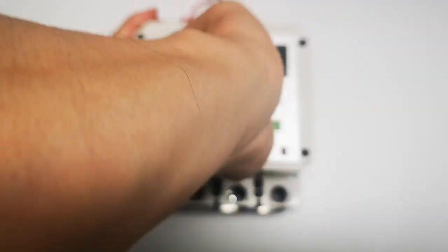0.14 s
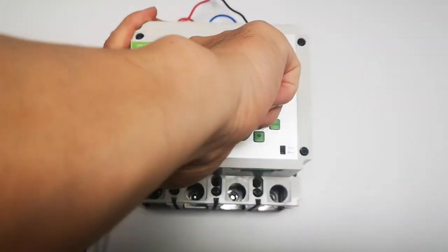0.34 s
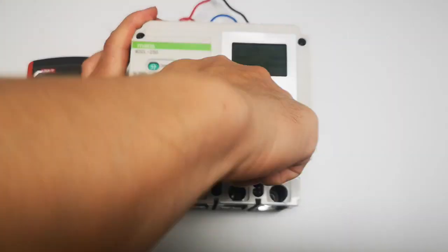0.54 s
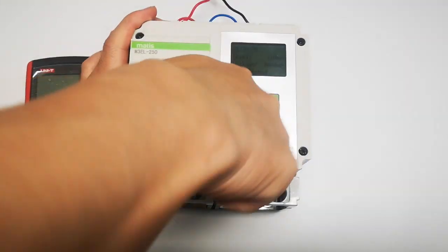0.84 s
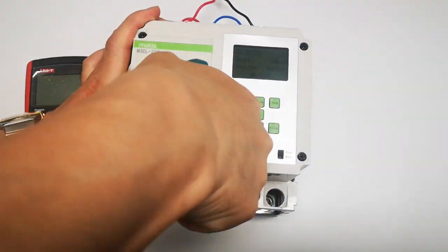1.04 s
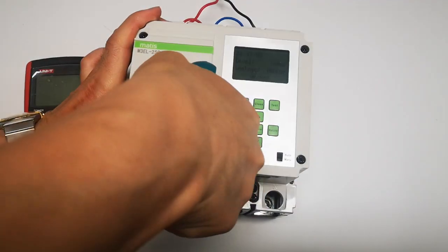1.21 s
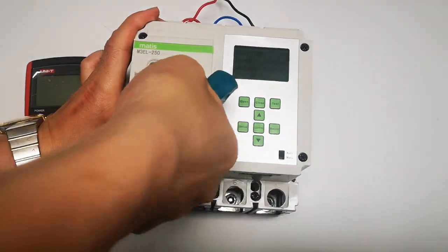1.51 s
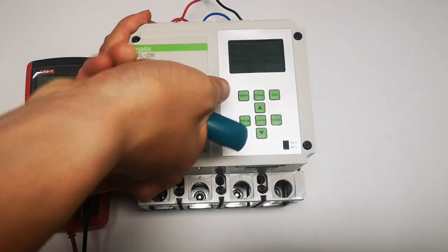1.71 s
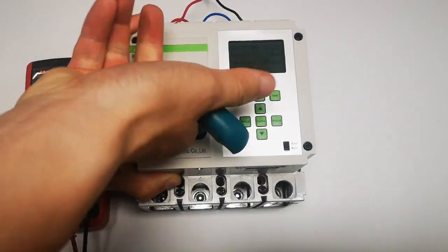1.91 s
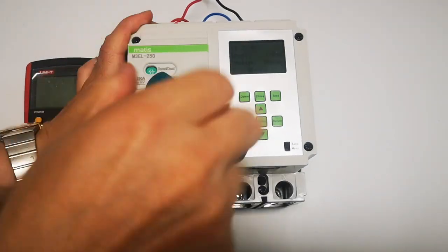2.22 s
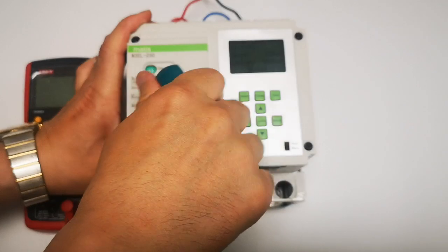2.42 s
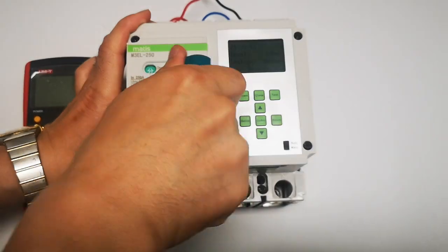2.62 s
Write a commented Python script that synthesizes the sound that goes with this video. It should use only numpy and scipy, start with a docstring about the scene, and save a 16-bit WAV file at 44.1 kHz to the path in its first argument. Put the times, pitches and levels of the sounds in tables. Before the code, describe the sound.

Sharp, springy plastic-cased breaker clacks at uneven intervals, with short ringing echoes and faint latch ticks

```python
"""A bare, ringing room: a moulded-case circuit breaker is worked by hand on a bench, close to the microphone.
Latches tick and the sprung mechanism clacks: shaped bursts and damped modes sound through the plastic case.
Each contact also thumps the bench and wakes the room's low standing waves; a long noise echo follows.
Soft hand bumps and a steady hush are filtered noise. A gain control ducks at each big clack
and swells back over the echo."""
import sys
import numpy as np
from scipy import signal
from scipy.fft import rfft, irfft, next_fast_len
from scipy.io import wavfile
from scipy.ndimage import uniform_filter1d, map_coordinates

SR = 44100
rng = np.random.default_rng(int(sys.argv[2]) if len(sys.argv) > 2 else 0)


def inscribe(sig):
    """Save sig as 16-bit PCM at rate SR to the path in sys.argv[1].

    A 1-D sig is mono; a 2-D sig holds one channel per row.
    Samples are clipped to [-1, 1] before scaling.
    """
    pcm = np.round(np.clip(np.atleast_2d(sig).T, -1, 1) * 32767)
    wavfile.write(sys.argv[1], SR, pcm.astype(np.int16))


N = 121275
LENGTH = 8192  # samples in one contact sound


def amp(db):
    """Amplitude factor of a level in dB."""
    return 10 ** (np.asarray(db) / 20)


def unit(x):
    """Scale a steady sound to rms 1."""
    return x / np.sqrt(np.mean(x ** 2) + 1e-20)


def strength(x):
    """Scale a short sound to the energy of 7 ms at rms 1."""
    energy = np.mean(np.sum(x ** 2, -1))
    return x / np.sqrt(energy / (.007 * SR))


def along(points, hz):
    """Read (pitch_hz, value) points on a log frequency axis."""
    point_hz, value = np.transpose(points)
    return np.interp(np.log(hz + 1), np.log(point_hz + 1), value)


def add(track, start_s, sound):
    """Mix a sound into the track at its start time."""
    part = track[:, round(start_s * SR):][:, :sound.shape[-1]]
    part += sound[..., :part.shape[1]]


def filtered(x, response):
    """Multiply the spectrum of x by a response of frequency."""
    n = x.shape[-1]
    padded = next_fast_len(n + LENGTH)
    hz = np.fft.rfftfreq(padded, 1 / SR)
    return irfft(rfft(x, padded) * response(hz), padded)[..., :n]


def causal(db):
    """Minimum-phase response with these gains: it rings only after the strike."""
    cepstrum = irfft(np.log(amp(db)))
    cepstrum[1:LENGTH // 2] *= 2
    cepstrum[LENGTH // 2 + 1:] = 0
    return np.exp(rfft(cepstrum))


def ring(modes, size, scatter_db):
    """Sum damped sine modes, each struck with a random level and phase."""
    t = np.arange(size) / SR
    total = 0
    for pitch_hz, level_db, t60_s in modes:
        struck_db = level_db + scatter_db * rng.standard_normal()
        phase = rng.random()  # cycles
        total = total + amp(struck_db - 60 * t / t60_s) * np.sin(2 * np.pi * (pitch_hz * t + phase))
    return total


# left-right likeness of diffuse sound at the microphone: pitch_hz, likeness (1 same, -1 opposite)
LIKENESS = [(100, 0.98), (250, 0.81), (500, 0.39), (1000, -0.48), (2000, -.05), (8000, 0.55)]


def stereo_noise(size):
    """Diffuse noise whose left-right correlation follows the likeness at each frequency."""
    def mid_side(hz):
        angle = np.arccos(np.clip(along(LIKENESS, hz), -1, 1)) / 2
        return np.array([np.cos(angle), np.sin(angle)])

    mid, side = filtered(rng.standard_normal((2, size)), mid_side)
    return np.array([mid + side, mid - side])


EARLY_DB, EARLY_T60_S = -4.5, 0.02  # near walls, level against the long echo
# time the long echo takes to fall by 60 dB: pitch_hz, t60_s
ECHO_T60 = [(100, 0.31), (400, 0.84), (1000, 0.71), (2200, 0.61), (5000, 0.59), (8000, 0.5), (11000, 0.46),
            (15000, 0.26)]


def room(x):
    """Answer x with near walls and a long diffuse echo, each band of it fading at its own rate."""
    hz, t, spectrum = signal.stft(stereo_noise(size=SR), SR, nperseg=256)
    fading = spectrum * amp(-60 * t / along(ECHO_T60, hz)[:, None])
    tail = signal.istft(fading, SR, nperseg=256)[1]
    t = np.arange(tail.shape[1]) / SR
    early = stereo_noise(size=len(t)) * amp(-60 * t / EARLY_T60_S)
    echo = tail / np.linalg.norm(tail[0]) + amp(EARLY_DB) * early / np.linalg.norm(early[0])
    onset = np.minimum(t / 0.0049, 1)
    return signal.fftconvolve(np.atleast_2d(x), echo * onset, axes=1)


HUSH_DB = -62.5
# colour of the room's hush: pitch_hz, level_db (relative)
HUSH = [(25, -1.5), (70, -6.5), (120, 3.5), (250, -3.5), (500, -12.5), (1200, -10), (2200, -7.5),
        (3500, -16), (8000, -25.5), (10500, -36.5), (15000, -39.5), (16000, -51.5)]


def room_tone():
    """The steady hush of the room: diffuse noise with a fixed spectrum."""
    return amp(HUSH_DB) * unit(filtered(stereo_noise(size=N), lambda hz: amp(along(HUSH, hz))))


# moments when the hand shifts the case: start_s, level_db, length_s (time constant of the fall)
NUDGES = [(0.066, -46, .08), (0.914, -50, 0.047), (1.4, -53, 0.12), (2.571, -45.5, 0.11)]
# colour of those bumps: pitch_hz, level_db (relative)
NUDGE_COLOUR = [(25, -6.5), (70, 20.5), (130, -7), (300, -9), (900, -56)]


def handling():
    """Soft low bumps as the hand leans on the case: noise that swells and dies away."""
    t = np.arange(N) / SR
    swell = np.zeros(N)
    for start_s, level_db, length_s in NUDGES:
        rise = np.clip((t - start_s) / 0.018, 0, 1)
        swell += amp(level_db) * rise * np.exp(-abs(t - start_s) / length_s)
    rumble = filtered(stereo_noise(size=N), lambda hz: amp(along(NUDGE_COLOUR, hz)))
    return swell * unit(rumble)


THUMP_S = 0.011  # time constant of the push, before its spectrum is flattened
LOW_ROOM_DB = -1.5  # echo of the thump
STANDING_T60_S, STANDING_RISE_S = .88, 0.034  # fall by 60 dB, time constant of the build-up
# response of the bench: pitch_hz, level_db (relative)
BENCH = [(25, 0), (60, -1), (120, 4.5), (240, 3.5), (330, -1), (480, -14.5), (900, -65.5), (3000, -35)]
# standing waves of the room: pitch_hz, level_db (against the thump)
STANDING_WAVES = [(66, -20.5), (119.6, -11.5), (143.5, -13), (179, -20.5), (223, -19), (268, -15.5)]


def bench():
    """The recoil of each contact thumps the bench and sets the room's standing waves going."""
    out = np.zeros((2, N))
    hz, t = np.fft.rfftfreq(LENGTH, 1 / SR), np.arange(SR) / SR
    waves = [(pitch_hz, level_db, STANDING_T60_S) for pitch_hz, level_db in STANDING_WAVES]
    fall = np.exp(-np.arange(LENGTH) / SR / THUMP_S)
    for start_s, level_db, *_, thump_db, _ in CLACKS:
        level = amp(level_db + thump_db)
        push = rfft(fall * rng.standard_normal(LENGTH))
        knock = irfft(push / abs(push) * causal(along(BENCH, hz)))
        thump = level * strength(knock[:LENGTH // 2])
        add(out, start_s, thump)
        add(out, start_s, amp(LOW_ROOM_DB) * room(thump))
        boom = ring(waves, size=SR, scatter_db=2)
        add(out, start_s, level * boom * (1 - np.exp(-t / STANDING_RISE_S)))
    return out


ATTACK_S, RELEASE_S = 0.00066, 0.015  # time constant of the rise, fall by 60 dB


def chatter(length_s):
    """A few milliseconds of contact, nearly even across all frequencies."""
    t = np.arange(LENGTH) / SR
    shape = (1 - np.exp(-t / ATTACK_S)) * amp(-60 * np.maximum(t - length_s, 0) / RELEASE_S)
    burst = rng.standard_normal((2, LENGTH)) * shape  # one for each side of the case
    for _ in range(3):  # flatten the spectrum, then shape in time again
        spectrum = rfft(burst)
        burst = irfft(spectrum / (abs(spectrum) + 1e-12)) * shape
    return burst


EDGE_POWER = 4  # steepness of a contact's low and high edges
RING_OCTAVES = .25  # width of the main ring
RIPPLE_DB, RIPPLE_HZ = 2.5, 108.2  # crowded small resonances: depth, spacing
# how much of the treble setting applies: pitch_hz, share
TREBLE = [(1800, 0.46), (4000, 0.91), (9000, 1)]


def colour(hz, low_hz, high_hz, ring_hz, ring_db, treble_db):
    """What one point of contact brings out of the case, in dB."""
    low_edge = 1 + (low_hz / (hz + 1)) ** (2 * EDGE_POWER)
    high_edge = 1 + (hz / high_hz) ** (2 * EDGE_POWER)
    edges_db = np.maximum(-10 * np.log10(low_edge * high_edge), -50)
    octaves_away = np.log2((hz + 1) / ring_hz)
    peak_db = ring_db * np.exp(-.5 * (octaves_away / RING_OCTAVES) ** 2)
    ripple_db = RIPPLE_DB * map_coordinates(rng.standard_normal(size=512), [hz / RIPPLE_HZ])
    return edges_db + peak_db + ripple_db + treble_db * along(TREBLE, hz)


DIRECT_PAN_DB = -6.5  # direct clack, left minus right
ROOM_DB = -2.5  # echo of the clack
# contacts of the mechanism, which the bench answers too: start_s, level_db, low_edge_hz, high_edge_hz,
# ring_hz, ring_db, treble_db, thump_db (bench, against level_db), length_s (chatter)
CLACKS = [(0.2115, -38, 2500, 14000, 2900, -3, 8.5, -6.5, 0.0027),
          (0.2383, 13.5, 787, 15000, 1800, 7.5, 8, -21.5, 0.0042),
          (0.5555, -12, 390, 14000, 1700, 2.5, -1.5, -8, 0.0041),
          (0.568, -13.5, 300, 13000, 1950, 5.5, 8.5, -21.5, 0.0045),
          (1.005, -41, 705, 13000, 1500, 4.5, -5, -6.5, .004),
          (1.19, -43, 950, 5900, 3600, 4, 5, -13, 0.00428),
          (1.4218, -27.5, 2380, 14000, 2407, 9.5, -6.5, -21, .0025),
          (1.483, -27.5, 1130, 11100, 2550, -1.5, -7.5, -11.5, .0055),
          (1.6368, -22.5, 940, 17300, 1200, 8.5, 3, -23, .0025),
          (1.7248, -25, 300, 10000, 1100, 9, -3, -6, 0.01),
          (1.736, -3, 300, 13000, 2330, 1, 1.5, -10, .005),
          (1.7545, -8.5, 300, 13000, 2000, 6.5, -2, -13, 0.0046),
          (2.436, -44.5, 800, 6000, 1300, 12, -13, -10, .005),
          (2.4393, -29.5, 500, 11500, 1220, 2, -6, -36, 0.0061),
          (2.4535, -26, 400, 14000, 1850, 6, 0.5, -19, 0.009),
          (2.465, -29, 400, 13000, 1200, 4.5, -11, -11, 0.0032),
          (2.475, -34.5, 600, 15000, 8650, 0.5, 19, -2.5, 0.0059),
          (2.708, -48.5, 900, 9000, 2540, 7, -8, 4, 0.00247)]
# response of the plastic case: pitch_hz, level_db (relative)
CASE = [(100, -20.5), (350, -7), (620, -11.5), (850, -8), (1100, -3.5), (1450, -4.5), (1850, 0), (2400, -2),
        (3200, -6.5), (4500, -10), (6200, -13.5), (7300, -11), (9000, -15), (10400, -27.5), (14800, -35),
        (16000, -46.5)]
# ringing of case and steel parts: pitch_hz, level_db (relative), t60_s
PART_MODES = [(1390, -9.5, 0.061), (1667, -7.5, .013), (2233, -15, .012), (2850, -23, .02),
              (3110, -20, 0.014), (3800, -21.5, 0.033), (5300, -28, 0.025), (5350, -17.5, 0.056),
              (7000, -44.5, .022), (8400, -55.5, .014)]


def breaker():
    """Each contact rattles the plastic case and rings its parts; the room answers."""
    out = np.zeros((2, N))
    hz, t = np.fft.rfftfreq(LENGTH, 1 / SR), np.arange(LENGTH) / SR
    pan = amp(np.array([[.5], [-.5]]) * DIRECT_PAN_DB)
    attack = 1 - np.exp(-t / ATTACK_S)
    for start_s, level_db, *tone, _, length_s in CLACKS:
        case = strength(irfft(rfft(chatter(length_s)) * causal(along(CASE, hz))))
        parts = np.array([ring(PART_MODES, size=LENGTH, scatter_db=2.5) for _ in range(2)]) * attack
        coloured = irfft(rfft(case + parts) * causal(colour(hz, *tone)))
        clack = amp(level_db) * strength(coloured)
        add(out, start_s, clack * pan)
        add(out, start_s, amp(ROOM_DB) * room(clack))
    return out


def scene():
    """Hush, hand, bench and breaker together in the room."""
    return room_tone() + handling() + bench() + breaker()


# where gain control sets in, share of the excess it removes, time it takes to let go
THRESHOLD_DB, SQUEEZE, RECOVER_S = -13, .79, .32


def gain_control(x, size, count):
    """Gain in dB, by blocks: it drops just ahead of a loud clack and climbs back in a set time."""
    power = abs(uniform_filter1d(np.mean(x ** 2, 0), size=300))  # centred, so it sees a clack coming
    level_db = 10 * np.log10(power + 1e-12)
    duck_db = SQUEEZE * np.maximum(level_db[::size] - THRESHOLD_DB, 0)
    recent_db = np.lib.stride_tricks.sliding_window_view(np.pad(duck_db, (count - 1, 0)), count)
    age_s = np.arange(count)[::-1] * size / SR
    held_db = np.max(recent_db * (1 - age_s / RECOVER_S), axis=1)  # deepest duck still letting go
    return -np.interp(np.arange(N), np.arange(N)[::size], held_db)


TOP_HZ = 16000  # nothing passes from here up
# unequal ports of the microphone: pitch_hz, level_db (left minus right)
PORTS = [(300, 0), (600, -1), (1100, 1.5), (2000, -3.5), (3200, -2.5), (5000, 1.5), (9000, 3.5),
         (12000, -4.5)]


def record(dry):
    """The close microphone: unequal ports, gain control, clipping and a band limit."""
    halves = np.array([[.5], [-.5]])
    x = filtered(dry, lambda hz: amp(halves * along(PORTS, hz)))
    x = x * amp(gain_control(x, size=32, count=450))
    return filtered(np.clip(x, -1, 1), lambda hz: hz < TOP_HZ)


dry = scene()
out = record(dry)
inscribe(out)
```